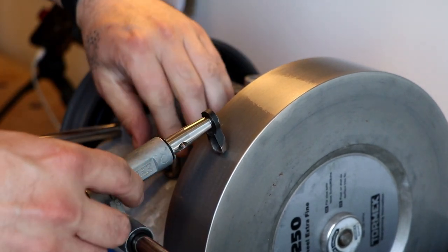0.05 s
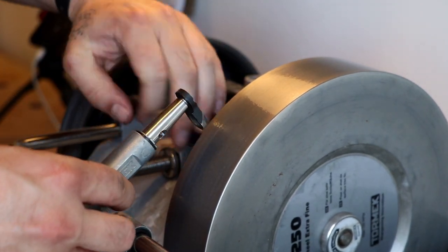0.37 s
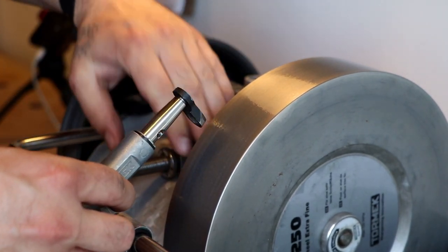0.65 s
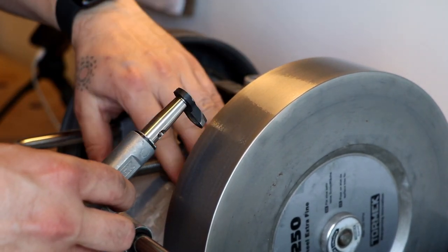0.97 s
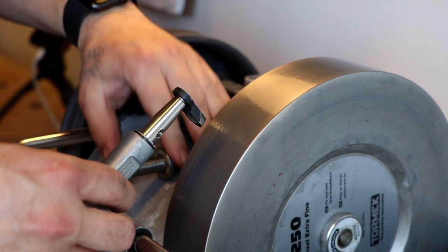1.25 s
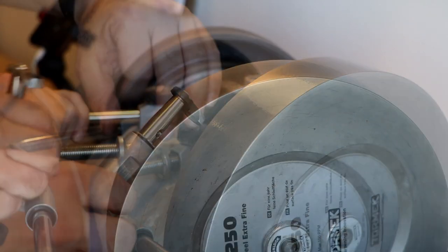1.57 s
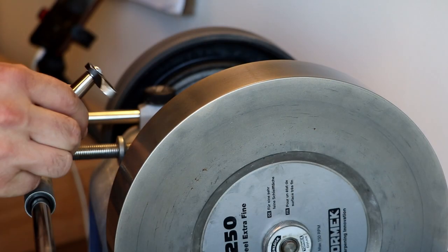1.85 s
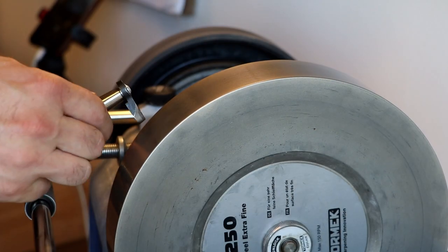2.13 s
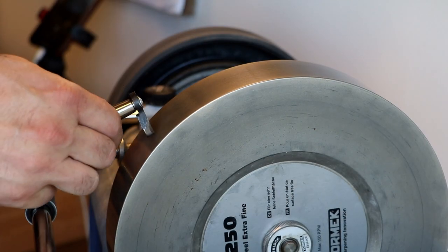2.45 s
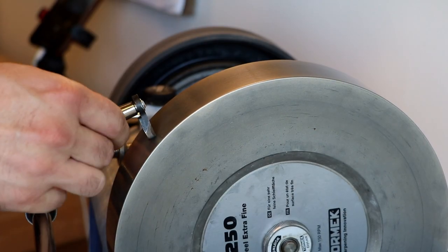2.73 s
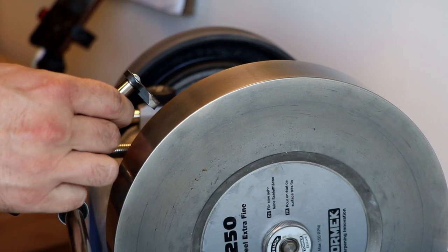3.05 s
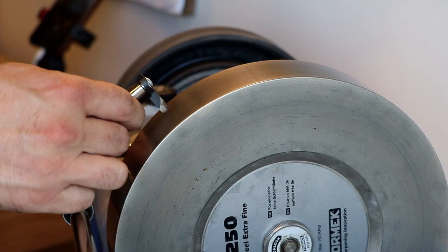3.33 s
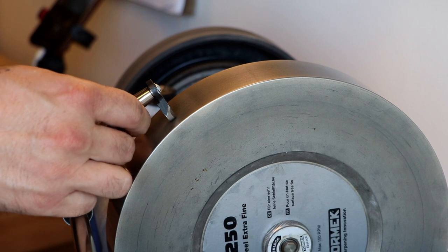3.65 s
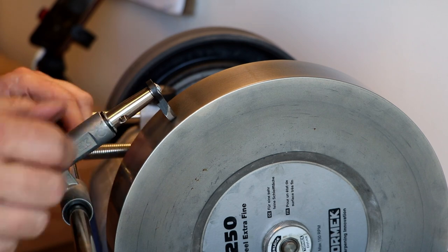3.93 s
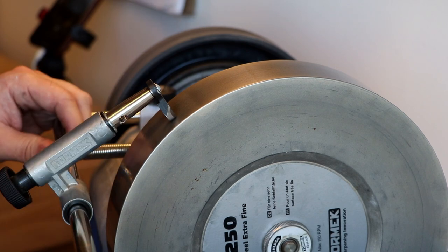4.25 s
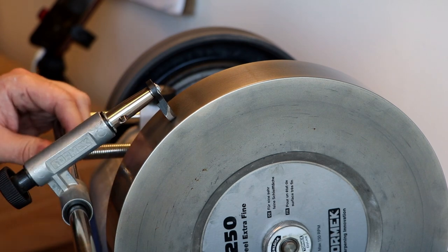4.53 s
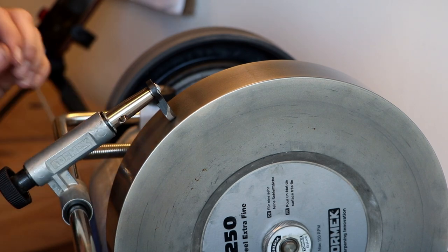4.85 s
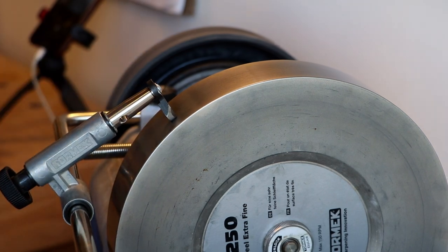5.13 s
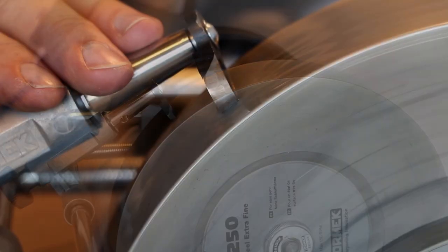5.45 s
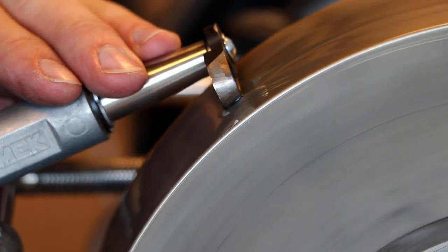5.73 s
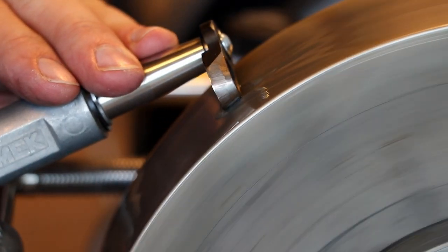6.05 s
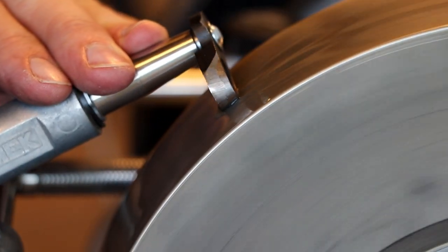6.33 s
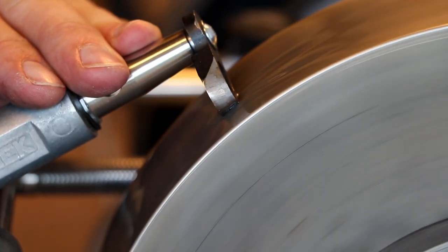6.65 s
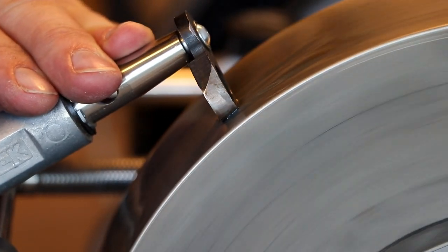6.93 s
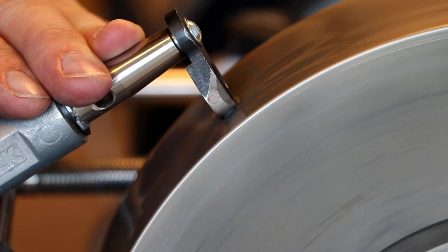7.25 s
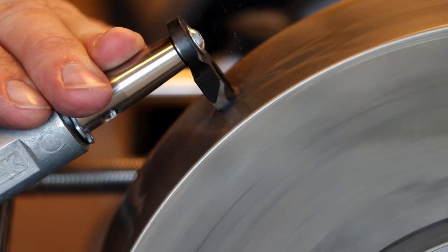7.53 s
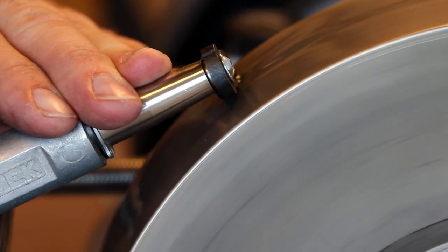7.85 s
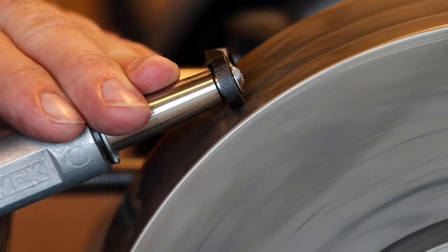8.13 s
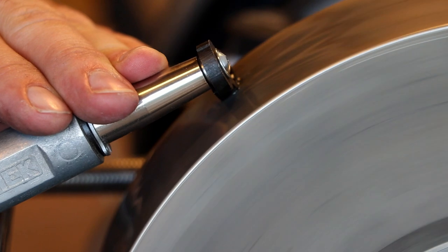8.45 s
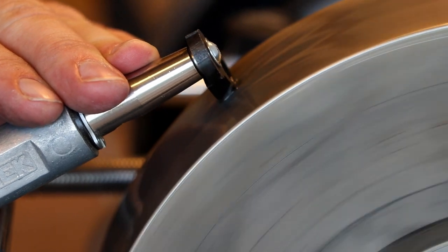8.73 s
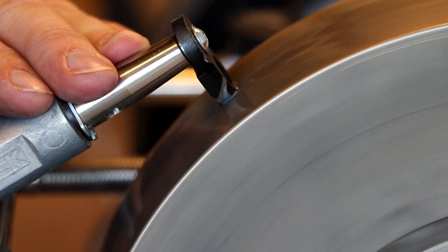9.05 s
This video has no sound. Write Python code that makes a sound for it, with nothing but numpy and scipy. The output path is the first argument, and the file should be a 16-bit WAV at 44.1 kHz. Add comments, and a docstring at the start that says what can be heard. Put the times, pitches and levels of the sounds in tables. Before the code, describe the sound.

Small metal clicks and knocks in a jig, then a sharpening machine hums as a steel cutter rasps and squeals on the wheel.

```python
"""Small clicks, scrapes and dull knocks sound in a small workshop: a steel ring cutter is being clamped
in a jig, and each contact excites damped modes of the metal. Then a sharpening machine hums and the
cutter is laid on the turning wheel. Abrasive grains strike the edge and rasp coarsely under pressure.
Friction also drives self-excited vibration: a high whistle under a light touch, then a stick-slip
squeal whose pitch shifts as the cutter is rolled."""
import sys
import numpy as np
from scipy import signal
from scipy.fft import rfft, irfft
from scipy.io import wavfile
from scipy.ndimage import uniform_filter1d

SR = 44100
rng = np.random.default_rng(int(sys.argv[2]) if len(sys.argv) > 2 else 0)


def store_wav(level_fs):
    """Save 16-bit WAV to argv[1]."""
    pcm = np.round(np.clip(np.atleast_2d(level_fs), -1, 1) * 32767)
    wavfile.write(sys.argv[1], SR, pcm.T.astype(np.int16))


N = 400869
T = np.arange(N) / SR
MOTOR_ON_S = 5.475

# the edge snags and its slips alternate strong and weak: peak_s, rise_s, fall_s, level_db
EDGE_SNAGS = [(6.705, 0.019, 0.019, -27.5), (6.82, 0.022, 0.022, -35), (6.96, 0.037, .03, -28),
              (7.9, 0.12, .11, -27), (8.73, 0.016, 0.037, -35.5), (8.96, 0.04, 0.035, -38.5)]
# rough screeches that break into the whistle: start_s, length_s, pitch_hz, level_db
EDGE_SCREECHES = [(6.45, 0.063, 4327, -20.5), (6.493, 0.073, 4430, -31.5), (6.601, 0.024, 4510, -25),
                  (6.617, 0.059, 4590, -30), (6.671, 0.051, 4350, -28.5)]
# the cutter's shank grates in the jig: start_s, level_db, bass_db, treble_db, rise_s
SHANK_SCRAPES = [(0.51, -46.5, -5, -13, 0.017), (0.69, -43, -10, -17, 0.011),
                 (0.781, -35, -15, -6.5, 0.0098), (0.826, -46, -17, -27, 0.0047),
                 (1.021, -33, -39, -8.5, 0.0084), (1.181, -42, -26, -0.5, 0.013),
                 (1.275, -32.5, -23, -11.5, 0.015), (1.48, -46, -3.5, -4, 0.021)]


def squeal(pressure, strengths, heavy_db=-42, choke_db=-31, steady_db=-22):
    """Stick-slip oscillation: weak vibration is ragged and sputters, strong vibration locks into a tone."""
    # slip rate as the cutter is rolled: time_s, pitch_hz
    slip_rate = [(6.68, 4230), (6.83, 4180), (7.0, 4180), (7.12, 4110), (7.55, 4055), (7.72, 3995),
                 (7.85, 4058), (8.07, 4090), (8.23, 4240), (8.38, 4600), (8.44, 4140), (8.53, 4025),
                 (8.68, 4012), (8.86, 4110), (9.09, 4095)]
    # side tones of uneven slips, at quarter steps: pitch_ratio, relative_db
    uneven_tones = [(3 / 4, -29), (5 / 4, -25), (9 / 4, -13.5), (13 / 4, -17)]
    # period doubling, as slips alternate under heavy pressure: pitch_ratio, relative_db
    doubled_tones = [(1 / 2, -12), (3 / 4, -16), (3 / 2, -12), (5 / 2, -10), (7 / 2, -20)]
    first, second, third, uneven = strengths
    trade = amp(wander(30))  # energy swings between the fundamental and the third harmonic
    steadiness = np.hypot(1, np.hypot(first, second) / amp(steady_db))
    sputter = amp(3 * np.minimum(wander(40), 1) / steadiness)
    hz = np.interp(T, *np.transpose(slip_rate))
    locked = 1 / (1 + (hz / 4290) ** 70)  # above the cutter's resonance the overtones die
    free = locked / np.hypot(1, pressure / amp(choke_db))  # heavy pressure chokes them too
    first, second, third = first / np.sqrt(trade), free * second, free * third * trade
    upset = amp(-41) + 1.4 * pressure  # coarse grains upset the rhythm
    ragged = np.minimum(.05 + upset / (np.hypot(first, .6 * second) + 1e-9), 1.1)
    phase = 2 * np.pi * np.cumsum(hz + (5 + 15 * ragged) * wander(70)) / SR
    tone = slip_harmonic(first, phase, ragged)
    tone += slip_harmonic(second, 2 * phase, ragged + .1)
    tone += slip_harmonic(third, 3 * phase, ragged + .6)
    # jitter of the slips spreads a skirt around the overtones
    overtones = amp(-18) * second * np.exp(2j * phase) + amp(-12) * third * np.exp(3j * phase)
    tone += narrowband(450) * overtones
    heavy = pressure ** 2 / (pressure ** 2 + amp(heavy_db) ** 2)
    doubled = np.hypot(heavy * np.hypot(first, third), swells(EDGE_SNAGS))
    for table, strength in ((uneven_tones, (1 - heavy) * uneven), (doubled_tones, doubled)):
        side_tones = sum(amp(db) * np.exp(1j * ratio * phase) * narrowband(85) for ratio, db in table)
        tone += locked * strength * side_tones
    # off resonance, a side tone at five quarters comes forward
    companion = amp(-47) * np.tanh(first / amp(-48)) * (1 - .75 * locked)
    tone += companion * np.exp(1j * 5 / 4 * phase) * narrowband(160)
    return 2 ** .5 * tone.real * sputter


def squeal_strength(fall_s=0.021):
    """Self-excited bursts build up and decay: gains of three harmonics and of the uneven slips."""
    # bursts of squeal: start_s, length_s, first_db, second_db, third_db, change_db, uneven_db
    bursts = [(6.674, .05, -26.5, -24, -31.5, -5, 9), (6.776, 0.093, -32, -29.5, -38.5, -5.5, -4),
              (6.906, 0.082, -28.5, -17, -28, 2, -6), (7.004, 0.077, -32, -22, -27, 2, -12),
              (7.08, 0.85, -27, -26, -29.5, -4, 6), (7.785, 0.16, -21, -28.5, -26.5, 1, -8.5),
              (7.964, 0.23, -24.5, -29, -21.5, -11.5, -5.5), (8.19, 0.23, -36, -41, -48, -12.5, -8),
              (8.382, 0.018, -27.5, -57, -58, -0.5, -11), (8.419, 0.14, -30.5, -35, -29, 5, -1.5),
              (8.534, 0.24, -23, -30, -26.5, -7.5, 3), (8.798, 0.2, -36, -42.5, -34.5, 0.5, -6.5),
              (9.045, 0.056, -38.5, -43, -41.5, 4, -5)]
    power = np.zeros((4, N))
    for start, length, first_db, second_db, third_db, change_db, uneven_db in bursts:
        t = np.arange(int((length + .2) * SR)) / SR
        rise_s = min(0.0099 + 0.12 * length, 0.027)
        held = np.minimum(t / rise_s, 1) * amp(change_db * np.minimum(t / length, 1))
        shape = held * np.exp(-np.maximum(t - length, 0) / fall_s)
        uneven = amp(uneven_db) * np.hypot(amp(first_db), amp(third_db))
        for track, gain in zip(power, (amp(first_db), amp(second_db), amp(third_db), uneven)):
            add(track, start, (gain * shape) ** 2)
    return np.sqrt(power)


def slip_harmonic(gain, phase, blur):
    """Random modulation by uneven slips broadens one harmonic without adding power."""
    return gain * np.exp(1j * phase) * (1 + blur * narrowband(139)) / np.sqrt(1 + blur ** 2)


def whistle(gain, pitch_hz=9650, difference_db=-4, sum_db=-11):
    """Friction sustains a high mode; nonlinear mixing with screeches gives sum and difference tones."""
    # other modes of the cutter, shaken by the whistle: pitch_hz, width_hz, relative_db
    shaken_modes = [(4350, 65, -31), (5170, 190, -30), (9280, 150, -25), (10040, 510, -26),
                    (13400, 1600, -31)]
    high = np.exp(2j * np.pi * np.cumsum(pitch_hz + 14 * wander(120) + 7 * wander(6)) / SR)
    ragged = np.minimum(0.21 + amp(-44) / (gain + 1e-9), 3)
    out = 2 ** .5 * slip_harmonic(gain, np.angle(high), ragged).real * amp(1.15 * wander(51))
    out += gain ** 0.37 * np.tanh(gain / amp(-66)) * amp(-11) * ringing(shaken_modes)
    roughness, mixed_roughness = unit(1 + 0.38 * narrowband(220)), unit(1 + 0.51 * narrowband(300))
    for start, length, hz, db in EDGE_SCREECHES:
        low = np.exp(2j * np.pi * hz * T) * roughness
        mixed = high * mixed_roughness * (amp(difference_db) * low.conj() + amp(sum_db) * low)
        out += amp(db) * screech_swell(start, length) * (low + amp(-13) * low ** 2 + mixed).imag
    return out


def whistle_strength(catch_s=6.215, rise_s=0.082, release_s=6.65, sag_db_per_s=37, die_db_per_s=244):
    """An unstable mode grows exponentially, catches, sags, then dies as the edge bites."""
    before, after = np.minimum(T - catch_s, 0), np.maximum(T - catch_s, 0)
    creep = amp(-44.5 + 65 * before)
    held = (1 - np.exp(-after / rise_s)) * amp(-12.5 - sag_db_per_s * after)
    return (creep + held) * amp(-die_db_per_s * np.clip(T - release_s, 0, 1))


def screech_swell(start, length):
    """The amplitude envelope of one screech: a flattened half sine."""
    return abs(np.sin(np.pi * np.clip((T - start) / length, 0, 1))) ** 0.46


def grinding(pressure, extra_hiss, ring_limit_db=-31, hiss_limit_db=-35):
    """Grain impacts excite cutter and holder; the rasp grows with pressure, ring and hiss saturate."""
    # the lightly held cutter's modes: pitch_hz, width_hz, relative_db
    cutter_modes = [(1157, 47, -13), (1413, 98, -5), (1657, 135, -2.5), (2035, 51, -20), (2660, 490, -11.5),
                    (3030, 81, -8)]
    # the bevel lies flat on the wheel and the cutter rings out: peak_s, rise_s, fall_s, level_db
    flat_touches = [(5.6, 0.017, 0.093, -49), (5.74, 0.064, 0.066, -48), (7.12, 0.13, 0.2, -34),
                    (8.3, 0.043, 0.06, -46.5)]
    # coarse abrasion: frequency_hz, density_db
    rasp_spectrum = [(88, -68), (150, -43), (263, -25), (352, -4.5), (453, -12.5), (766, -3), (985, -10.5),
                     (1130, -8), (1700, 0), (2060, -6), (4060, -1.5), (5870, -7), (8170, -7.5),
                     (12300, -9.5), (15500, -39)]
    # resonances of cutter and holder: pitch_hz, width_hz, relative_db
    holder_modes = [(355, 30, 7), (2080, 70, -4), (3060, 110, 5), (4150, 200, 0), (5550, 120, -4),
                    (6420, 70, -1), (7410, 80, 0), (8360, 70, 9), (9650, 150, -2), (10950, 150, 2),
                    (12520, 80, 4), (13420, 150, 5)]
    # fine friction: frequency_hz, density_db
    hiss_spectrum = [(1500, -2.5), (3500, 6), (4500, 15), (5500, 14.5), (6700, -2.5), (8200, 10),
                     (10000, 9.5), (13300, 5), (14700, 3), (15700, -14)]
    # the cutter's high modes: pitch_hz, width_hz, relative_db
    high_modes = [(4320, 200, 4), (5480, 140, 4), (6420, 60, 0), (7760, 150, 0), (8360, 70, 12),
                  (9290, 150, 3), (10160, 200, 1), (13330, 130, 8)]
    large, small = grit(3500, 2.2, smooth=.7), grit(6000, 1.2, smooth=1)
    ring_gain = amp(ring_limit_db) * np.tanh(pressure * amp(3 - ring_limit_db))
    hiss_gain = amp(hiss_limit_db) * np.tanh(pressure * amp(6 - hiss_limit_db))
    ring = np.hypot(ring_gain, swells(flat_touches)) * ringing(cutter_modes) * amp(2 * wander(92))
    rasp = pressure * amp(9) * colour(large, rasp_spectrum, holder_modes)
    hiss = np.hypot(hiss_gain, extra_hiss) * colour(small, hiss_spectrum, high_modes)
    return (ring + rasp + hiss) * amp(0.68 * wander(27))


def contact_pressure():
    """The normal force between edge and wheel, as a gain."""
    # how hard the cutter is pressed: time_s, force_db
    force = [(5.5, -69), (5.6, -73.5), (5.84, -57), (5.95, -64.5), (6.47, -57.5), (6.9, -63), (6.935, -48),
             (7.13, -41.5), (7.3, -41.5), (7.48, -30), (7.719, -30), (7.85, -44.5), (8.04, -54),
             (8.2, -64.5), (8.28, -54), (8.62, -59.5), (8.85, -66), (9.09, -60)]
    return gain_curve(force)


def chatter(strengths, whistling):
    """The gain of the extra hiss a vibrating edge throws; incoherent parts add in power."""
    _, second, _, uneven = strengths
    screeching = sum(amp(db) * screech_swell(start, length) for start, length, _, db in EDGE_SCREECHES)
    parts = [amp(-21) * np.hypot(second, uneven), amp(-31) * whistling,
             amp(-15) * screeching, amp(-13) * swells(EDGE_SNAGS)]
    return np.linalg.norm(parts, axis=0)


def chirps(swell_s=0.017, width_hz=110):
    """The edge catches briefly and excites a single resonance of the cutter."""
    # catches of the edge: peak_s, pitch_hz, level_db
    catches = [(5.57, 2080, -60), (5.59, 4350, -50), (5.965, 2540, -48), (6.135, 2380, -51),
               (6.48, 2640, -41)]
    return sum(np.exp(-((T - s) / swell_s) ** 2) * ringing([(hz, width_hz, db)]) for s, hz, db in catches)


def clicks(snap_t60_s=0.016):
    """Impulse excitation: a sharp contact gives a bright snap, then the jig rings freely."""
    # metal parts of the jig meet: start_s, level_db, bass_db, treble_db
    contacts = [(0.179, -55, 7, -24), (0.202, -41.5, -2, -12.5), (0.312, -44.5, -12, -10),
                (0.364, -48, -1, -14), (0.471, -38.5, -27, -6), (0.922, -49, -26, -23),
                (1.528, -37, -11, -13.5), (2.764, -41.5, -9, -24), (2.958, -49.5, 10.5, -15),
                (3.378, -29, -3, -3.5), (3.807, -42.5, -18.5, -16), (5.583, -41, -28, -8),
                (5.741, -45.5, -31, -23)]
    snap_spectrum = [(800, -19), (3000, -2), (11000, 21), (13000, -6), (15500, -24)]
    t, out = np.arange(SR // 4) / SR, np.zeros(N)
    impulse = 1. * (t == 0)
    for start, db, bass_db, treble_db in contacts:
        snap = colour(rng.standard_normal(len(t)), snap_spectrum) * amp(-60 * t / snap_t60_s)
        add(out, start, amp(db) * (jig(impulse, bass_db, treble_db) + amp(4 + treble_db) * snap))
    return out


def scrapes(slips_per_s=3000):
    """Sliding friction: a run of tiny slips swells and dies away, driving the jig."""
    t, out = np.arange(SR // 4) / SR, np.zeros(N)
    for start, db, bass_db, treble_db, rise in SHANK_SCRAPES:
        slips = rng.standard_normal(len(t)) * (rng.random(len(t)) < slips_per_s / SR)
        force = slips * np.sqrt(t / rise) * np.exp(-t / rise)
        add(out, start, amp(db) * jig(force, bass_db, treble_db))
    return out


def jig(force, bass_db, treble_db, body_t60_s=0.061):
    """Convolution of a force with the jig's impulse response; the loudest 5 ms have rms 1."""
    # the jig's dense, quickly damped body: frequency_hz, density_db
    body_spectrum = [(59, -31), (100, -27), (326, -5), (640, -6.5), (774, -6), (956, -5), (1800, -2.5),
                     (2000, 0.5), (3120, -8), (3460, -1), (4100, -15.5), (5280, -9), (10800, -25.5),
                     (15500, -33)]
    # its distinct modes: pitch_hz, relative_db, t60_s
    modes = [(456, 1, 0.1), (753, 13.5, 0.15), (1335, -21, 0.05), (1666, 0, 0.1), (1965, -8, 0.16),
             (2235, 9, 0.15), (2835, 17, 0.027), (4050, 4.5, 0.047), (3590, 6, 0.12), (5200, -10, 0.053),
             (6900, -5, 0.053), (8360, -6, .08)]
    t, size = np.arange(len(force)) / SR, 2 * len(force)
    tilt = [(500, bass_db + 8), (1100, 0), (3500, 0), (8000, treble_db + 9)]
    tilt_gain = amp(log_interp(tilt, np.fft.rfftfreq(size, 1 / SR)))
    body = colour(rng.standard_normal(len(t)), body_spectrum) * amp(-60 * t / body_t60_s)
    # each point of contact favours other modes
    ring = sum(rng.random() * amp(db - 60 * t / t60) * np.sin(2 * np.pi * (hz * t + rng.random()))
               for hz, db, t60 in modes)
    response = unit(body) + amp(-6) * unit(ring)
    hit = irfft(rfft(force, size) * rfft(response, size) * tilt_gain)[:len(t)]
    return hit / np.sqrt(uniform_filter1d(hit ** 2, SR // 200).max())


def knocks(upper_ratio=2.9):
    """Damped free vibration of the support bar: a low mode, a weaker upper one and a dull thud."""
    # blows on the bar: start_s, level_db, pitch_hz, t60_s
    blows = [(0.179, -38.5, 843, 0.06), (0.895, -30, 514, 0.077), (0.901, -41, 489, 0.22),
             (0.895, -45, 1493, 0.21), (1.031, -52, 149, 0.39), (1.174, -42.5, 504, 0.08),
             (1.285, -53.5, 154.4, 0.55), (1.646, -29, 480, 0.019), (2.764, -49, 311, 0.33),
             (3.38, -37.5, 415.5, 0.26), (3.381, -39.5, 308, 0.29), (3.386, -47, 218.4, 0.39),
             (3.769, -50, 332, 0.04), (3.814, -48.5, 326, 0.17), (3.873, -45.5, 209, 0.045),
             (4.008, -47.5, 169, 0.059), (5.308, -40.5, 254, 0.068), (5.328, -39.5, 166, 0.093)]
    t, out = np.arange(SR // 3) / SR, np.zeros(N)
    for start, db, hz, t60 in blows:
        thud_spectrum = [(hz / 4, -22), (hz * .7, 0), (hz * 1.4, -2), (hz * 4, -20), (hz * 16, -42)]
        thud = colour(rng.standard_normal(len(t)), thud_spectrum)
        modes = np.sin(2 * np.pi * hz * t) + amp(-13) * np.sin(2 * np.pi * hz * upper_ratio * t)
        add(out, start, amp(db - 60 * t / t60) * (modes + amp(-6) * thud))
    return out


def rubbing(drag_rise_s=0.011, drag_fall_s=0.078):
    """Faint friction noise from sliding on the bar and from the drag behind each scrape."""
    # fingers and jig slide on the bar: peak_s, rise_s, fall_s, relative_db
    slides = [(.25, .3, 0.18, -50.5), (1.0, 0.22, 0.15, -46.5), (2.0, 0.86, 0.5, -59.5),
              (3.12, 0.078, .075, -45), (4.12, 0.25, 0.071, -55.5), (4.94, 0.014, 0.023, -55),
              (5.315, 0.013, 0.11, -52)]
    # sliding friction: frequency_hz, density_db
    spectrum = [(88, -52), (150, -12), (362, 3), (541, -10), (739, -3), (991, -9.5), (1350, -6.5),
                (1690, -11.5), (2220, -12), (12000, -27.5), (15600, -57), (22000, -120)]
    drags = [(start + rise, drag_rise_s, drag_fall_s, db - 11) for start, db, _, _, rise in SHANK_SCRAPES]
    return amp(-6) * swells(slides + drags) * colour(grit(2000, 3, smooth=.6), spectrum)


def motor(hum_rise_s=.04, drive_rise_s=0.14):
    """Forced vibration: a line spectrum of mains hum over the broadband rumble of the friction drive."""
    # the motor's lines: pitch_hz, level_db
    lines = [(100.1, -60), (300.3, -65), (944.6, -64), (1044.8, -66), (1147, -94), (6404, -77)]
    # the hum's second harmonic fades under load: time_s, level_db
    octave_levels = [(5.49, -59), (5.85, -60), (6.1, -70), (7.0, -68.5), (9.09, -73)]
    # running noise of the drive: frequency_hz, density_db
    drive_spectrum = [(30, -56), (250, -11), (350, 2.5), (480, 1), (540, -1), (760, 2), (900, -8.5),
                      (1500, -7), (3000, -12.5), (7000, -82), (15000, -53)]
    hum = sum(amp(db) * np.sin(2 * np.pi * hz * (T + rng.random())) for hz, db in lines)
    hum += gain_curve(octave_levels) * np.sin(2 * np.pi * 2 * lines[0][0] * T)
    rumble = colour(rng.standard_normal(N), drive_spectrum, [(355, 30, 4), (455, 30, 3)])
    rumble *= amp(-50.5 + 1.6 * wander(14))
    hum_on, drive_on = (np.clip((T - MOTOR_ON_S) / rise, 0, 1) for rise in (hum_rise_s, drive_rise_s))
    return hum_on * 2 ** .5 * hum * (1 + 0.13 * wander(6.3)) + drive_on * rumble


def room(x):
    """Diffuse reverberation of a small room: a dense tail in which the treble dies first."""
    # reverberation time: frequency_hz, t60_s
    decay_times = [(150, 0.39), (600, 0.33), (3000, 0.3), (8000, 0.31), (15000, 0.039)]
    reflections = rng.standard_normal(SR // 2) * (np.arange(SR // 2) > .004 * SR)
    hz, t, bands = signal.stft(reflections, SR, nperseg=256)
    decay = amp(-60 * t / log_interp(decay_times, hz)[:, None])
    tail = signal.istft(bands * decay, SR, nperseg=256)[1]
    return signal.fftconvolve(x, tail / np.linalg.norm(tail) * np.sqrt(1 / 2))[:N]


def air(hiss_db=-59.5, rumble_db=-71.5):
    """Ambient noise: steady hiss, and a low rumble that comes and goes while the jig is handled."""
    # the quiet workshop: frequency_hz, density_db
    hiss_spectrum = [(12, -12), (20, -12), (145, -5.5), (208, -5.5), (384, -8), (466, -9), (567, -8.5),
                     (770, -15.5), (861, -14), (1020, -15), (2280, -19.5), (2930, -21.5), (15600, -20)]
    # the bench rumbles as hands shift on the machine: peak_s, rise_s, fall_s, level_db
    leans = [(.8, .5, .6, -94), (4.05, 0.77, 0.91, -66), (5.38, 0.21, 0.17, -63.5)]
    rumble_spectrum = [(15, -8), (30, 5.5), (70, 1), (300, -15.5), (900, -12.5), (4000, -50)]
    hiss = amp(hiss_db) * colour(rng.standard_normal(N), hiss_spectrum)
    rumble = colour(rng.standard_normal(N), rumble_spectrum) * amp(2.1 * wander(7.4))
    return hiss + np.hypot(amp(rumble_db) * (T < MOTOR_ON_S), swells(leans)) * rumble


def ringing(modes):
    """Resonances sustained by random friction."""
    return 2 ** .5 * sum(amp(db) * narrowband(width) * np.exp(2j * np.pi * hz * T)
                         for hz, width, db in modes).real


def grit(per_s, spread_db, smooth):
    """Shot noise: sparse grain impacts of uneven size over a smooth hiss."""
    size = amp(spread_db * np.minimum(rng.exponential(1, N), 4))
    grains = size * rng.choice([-1, 1], N) * (rng.random(N) < per_s / SR)
    return unit(unit(grains) + smooth * rng.standard_normal(N))


def narrowband(width_hz):
    """The complex envelope of a noise-driven resonance; rms 1."""
    pole = np.exp(-np.pi * width_hz / SR)
    noise = rng.standard_normal(N) + 1j * rng.standard_normal(N)
    return unit(signal.lfilter([1], [1, -pole ** 4], signal.lfilter([1], [1, -pole], noise)))


def wander(rate_hz):
    """Low-pass noise for random modulation; rms 1."""
    hz = np.fft.rfftfreq(N, 1 / SR)
    return unit(irfft(rfft(rng.standard_normal(N)) / (1 + (hz / rate_hz) ** 2), N))


def colour(x, spectrum, peaks=()):
    """Filters by a spectrum (frequency_hz, density_db) and resonances (pitch_hz, width_hz, db); rms 1."""
    hz = np.fft.rfftfreq(len(x), 1 / SR)
    resonance = 1 + sum(amp(db) ** 2 / (1 + (2 * (hz - f) / width) ** 2) for f, width, db in peaks)
    return unit(irfft(rfft(x) * amp(log_interp(spectrum, hz)) * np.sqrt(resonance), len(x)))


def swells(rows):
    """Gaussian rises and falls of gain; overlapping ones add in power."""
    power = np.zeros(N)
    for peak_s, rise_s, fall_s, db in rows:
        distance = (T - peak_s) / np.where(T < peak_s, rise_s, fall_s)
        power += amp(db) ** 2 * np.exp(-2 * np.minimum(distance ** 2, 20))
    return np.sqrt(power)


def gain_curve(points):
    """A gain through points (time_s, level_db), silent before the first."""
    return amp(np.interp(T, *np.transpose(points), left=-140))


def log_interp(points, hz):
    """Reads a table on a log-frequency axis."""
    f, value = np.transpose(points)
    return np.interp(np.log(hz + 1), np.log(f + 1), value)


def add(mix, start_s, sound):
    """Superposes a sound at a time."""
    part = mix[round(start_s * SR):][:len(sound)]
    part += sound[:len(part)]


def amp(db):
    """Decibels to gain."""
    return 10 ** (np.asarray(db) / 20)


def unit(x):
    """Scales to rms 1."""
    return x / np.sqrt(np.mean(abs(x) ** 2) + 1e-20)


def scene():
    """Clamping, then grinding: direct sound, reverberation and ambient noise superpose."""
    setup, thuds = clicks() + scrapes() + rubbing(), knocks()
    pressure, strengths, whistling = contact_pressure(), squeal_strength(), whistle_strength()
    machine = motor() + grinding(pressure, chatter(strengths, whistling))
    machine += whistle(whistling) + squeal(pressure, strengths) + chirps()
    reverberation = room(amp(-8) * setup + amp(-12) * thuds + amp(-14) * machine)
    return (setup + thuds + machine + reverberation + air())[None]


def record(dry, cutoff_hz=15750):
    """A steep low-pass filter limits the bandwidth."""
    lowpass = signal.firwin(511, cutoff_hz, window=("kaiser", 9), fs=SR)
    return signal.oaconvolve(dry, lowpass[None], "same")


dry = scene()
out = record(dry)
store_wav(out)
```